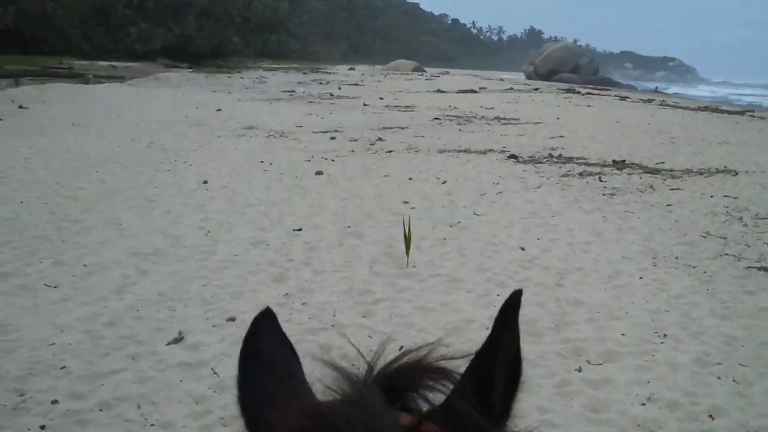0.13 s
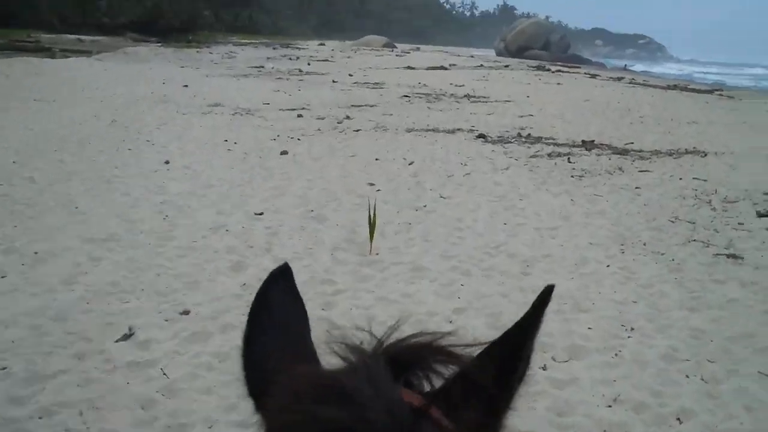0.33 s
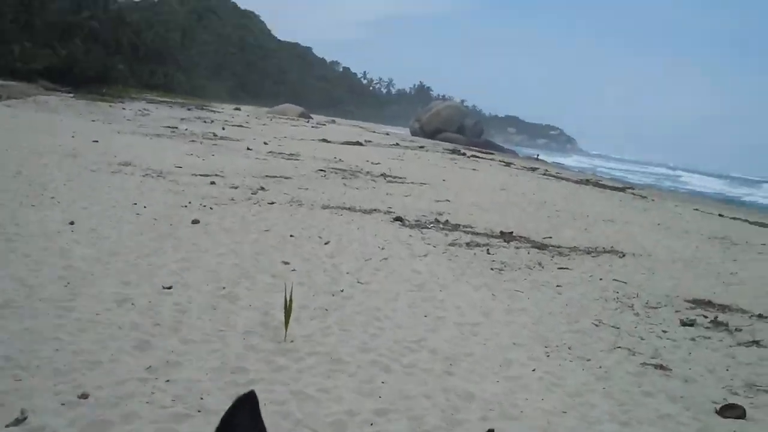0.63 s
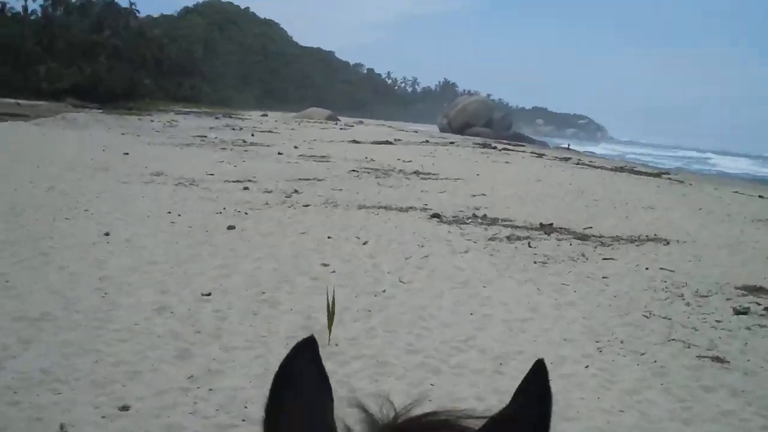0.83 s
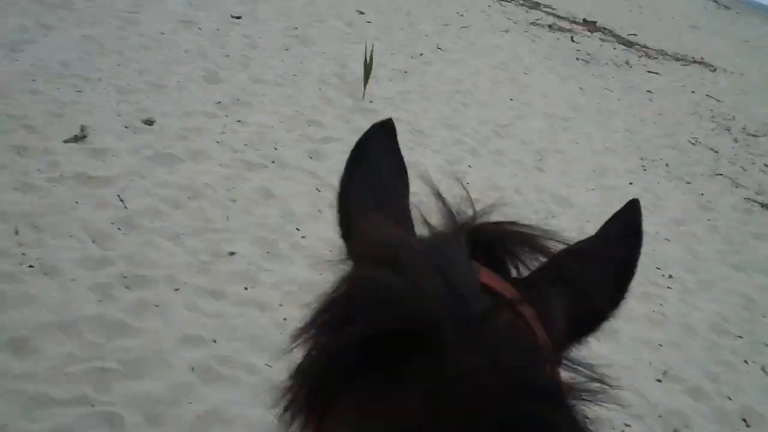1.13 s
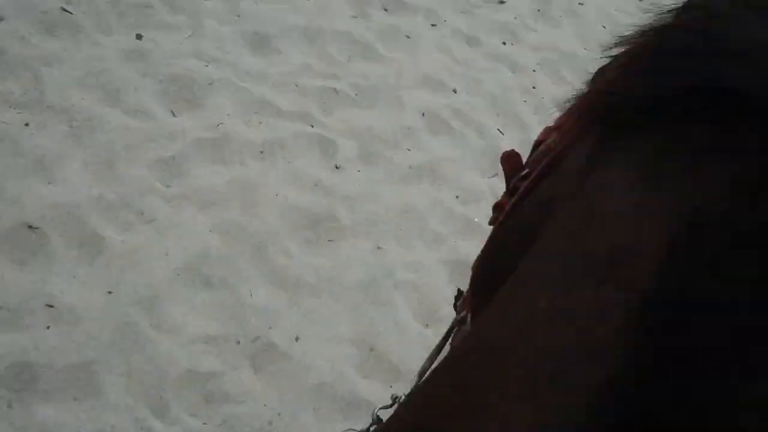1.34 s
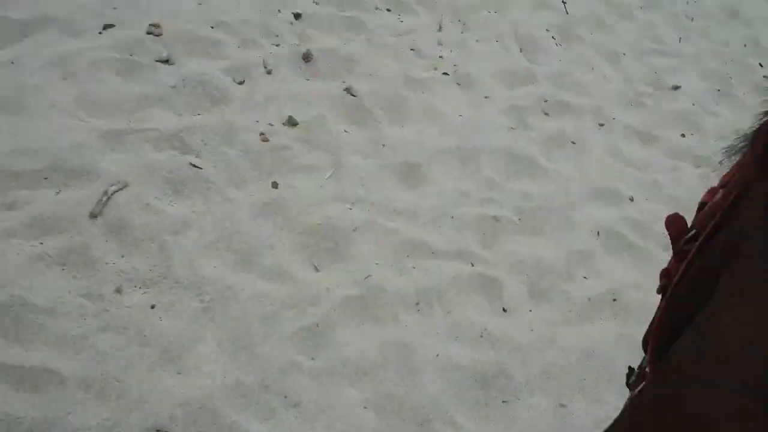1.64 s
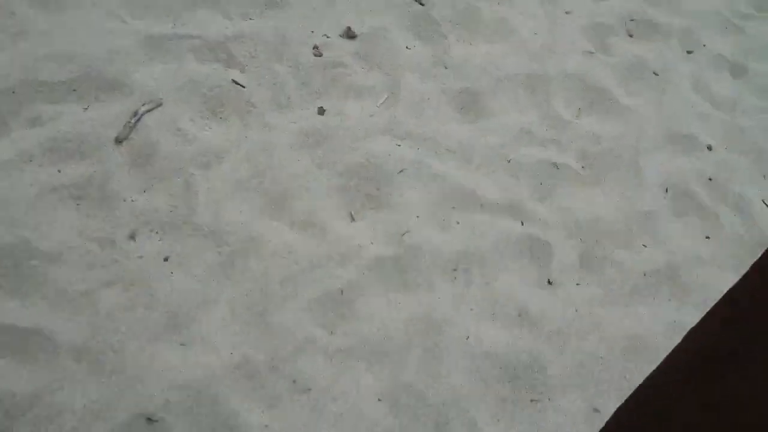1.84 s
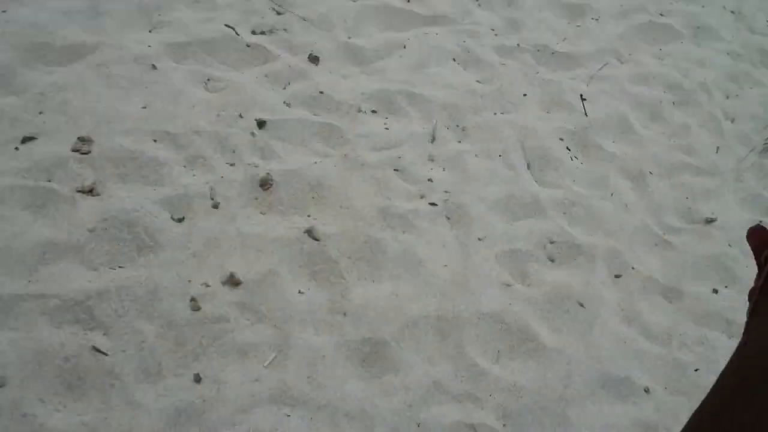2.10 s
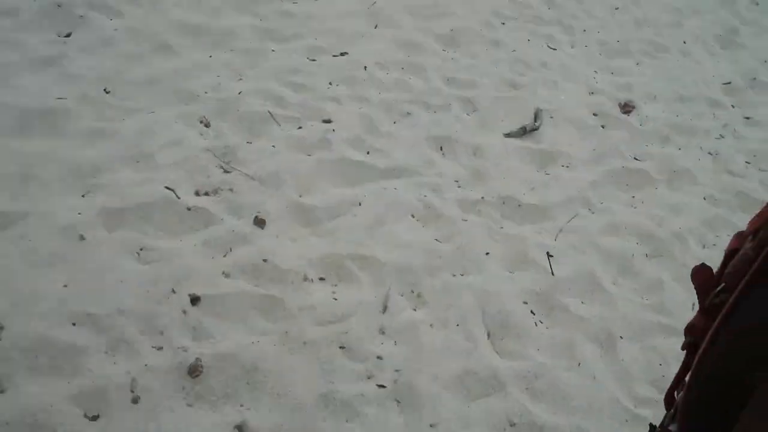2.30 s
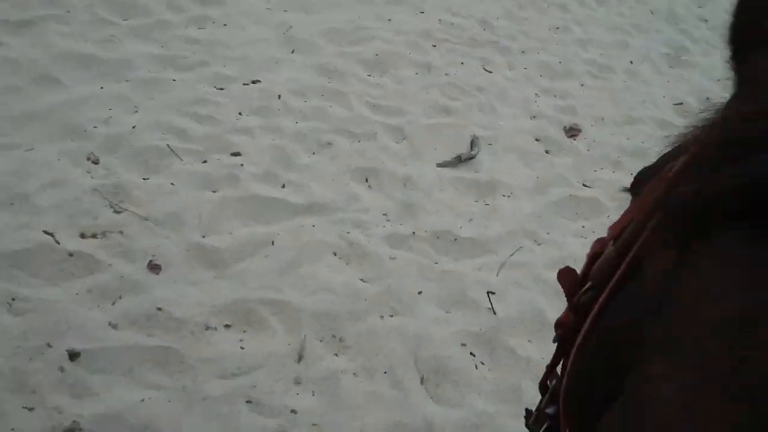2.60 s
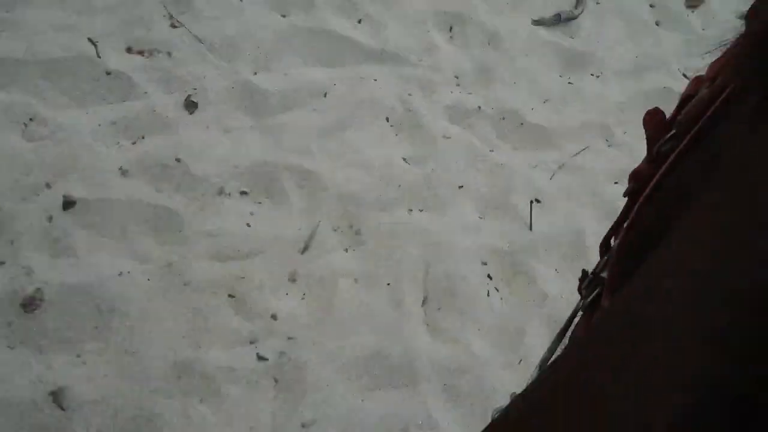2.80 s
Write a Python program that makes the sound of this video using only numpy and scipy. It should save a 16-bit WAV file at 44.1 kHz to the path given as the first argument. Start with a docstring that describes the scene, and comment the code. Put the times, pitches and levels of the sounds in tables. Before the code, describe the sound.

Soft sandy hoof swishes and dull thumps of a walking horse, with leather rubs, clicking tack and surf

```python
"""A horse walking on dry sand

Heard from the saddle: hooves push sand aside in gritty swishes of hiss and grains, with soft low thumps.
Leather rubs, and tack knocks, ticks and squeaks, made from short pulses, decaying rings and narrow noise.
Surf roars steadily some way off and a light wind rumbles on the microphone: both are noise shaped in bands.
A faint high electronic whine runs throughout. Both channels are the same."""
import sys
import numpy as np
from scipy import signal
from scipy.io import wavfile

SR = 44100
rng = np.random.default_rng(int(sys.argv[2]) if len(sys.argv) > 2 else 0)


def dump_mix(stems):
    """Bounce the given channels to the path in sys.argv[1] as a 16-bit WAV at rate SR."""
    frames = np.atleast_2d(stems).T  # one column per channel
    limited = np.clip(frames, -1, 1)  # hard clip at full scale
    pcm = np.round(limited * 32767).astype(np.int16)
    wavfile.write(sys.argv[1], SR, pcm)


N = 130095
TIME = np.arange(N) / SR  # seconds


def from_db(db):
    """Turn decibels into a factor that multiplies the wave."""
    return 10 ** (np.asarray(db) / 20)


def rms_one(x):
    """Scale a sound to an rms (average strength) of 1."""
    return x / np.sqrt(np.mean(x ** 2) + 1e-20)


def level(rows):
    """Draw a loudness curve through (t/s, level/dB) points, as a factor."""
    return from_db(np.interp(TIME, *np.transpose(rows)))


def butter(x, hz, kind, order=2):
    """Filter with a smooth Butterworth response that only looks back in time."""
    safe_hz = np.clip(hz, 5, .48 * SR)
    sections = signal.butter(order, safe_hz, kind, fs=SR, output="sos")
    return signal.sosfilt(sections, x + 1e-18)


def drift(rate_hz):
    """Wander slowly and at random around 0 with spread 1: noise smoothed twice."""
    step = 40  # one slow value per 40 samples, joined by straight lines
    run_in = 2000  # slow values dropped while the filter settles
    pole = np.exp(-2 * np.pi * rate_hz * step / SR)
    noise = rng.standard_normal(N // step + 2 + run_in)
    slow = signal.lfilter([1], [1, -2 * pole, pole * pole], noise)[run_in:]
    return np.interp(np.arange(N) / step, np.arange(len(slow)), rms_one(slow))


def resonate(x, hz, width_hz):
    """Let one narrow resonance ring, with a gain of about 1 at its peak."""
    radius = np.exp(-np.pi * width_hz / SR)
    feed = np.array([1, 0, -1]) * (1 - radius * radius) / 2
    feedback = [1, -2 * radius * np.cos(2 * np.pi * hz / SR), radius * radius]
    return signal.lfilter(feed, feedback, x + 1e-18)


def grains(per_s, spread_db):
    """Scatter single-sample clicks of uneven size at random times; rms 1."""
    size_db = spread_db * np.minimum(rng.exponential(1, N), 4)
    clicks = from_db(size_db) * rng.choice([-1, 1], N)
    return rms_one(clicks * (rng.random(N) < per_s / SR))


def grit(per_s, grain_db, spread_db):
    """Mix smooth hiss with grains at a level relative to it; rms 1."""
    return rms_one(rng.standard_normal(N) + from_db(grain_db) * grains(per_s, spread_db))


def bank(sources, low_hz, high_hz):
    """Split two sources, in turn, into half-octave bands: (centre f/Hz, band)."""
    run_in = SR // 4  # samples for the filters to settle
    edges = low_hz * 2 ** np.arange(0, np.log2(high_hz / low_hz) + .5, .5)
    padded = np.pad(sources, ((0, 0), (run_in, 0)), mode="wrap")
    bands = []
    for k, (low, high) in enumerate(zip(edges, edges[1:])):
        band = butter(padded[k % 2], [low, high], "band")[run_in:]
        bands.append((np.sqrt(low * high), band))
    return bands


def coloured(bands, spectrum, patchy_db):
    """Sum bands under a spectrum while each flickers on its own; rms 1."""
    hz, db = np.transpose(spectrum)
    total = np.zeros(N)
    for centre, band in bands:
        band_db = np.interp(np.log(centre), np.log(hz), db)
        total += band * from_db(band_db + patchy_db * drift(14.0))
    return rms_one(total)


def rubs(rows, width_hz):
    """Make short rubs: noise through one resonance twice, swelling and fading."""
    out = np.zeros(N)
    for s, db, hz, length in rows:
        swell = np.exp(-((TIME - s) / length) ** 2)
        once = resonate(rng.standard_normal(N), hz, width_hz)
        out += from_db(db) * swell * rms_one(resonate(once, hz, width_hz))
    return out


def surf():
    """The steady roar of breakers: broad noise, strongest in the lows."""
    # Tone of the roar, relative only: f/Hz, level per Hz/dB
    surf_spectrum = [(60, 2), (120, 2), (220, -1.5), (310, -6), (450, -13), (750, -16), (1100, -19.5),
                     (2000, -30.5), (3800, -32), (6000, -36), (7400, -40.5), (8300, -45.5), (10000, -39),
                     (12800, -41), (15000, -56)]
    bands = bank(rng.standard_normal((2, N)), 62.5, 16000)
    return from_db(-32.5) * coloured(bands, surf_spectrum, patchy_db=1.5)


def wind():
    """Wind on the microphone: lumpy low noise that grows in the second half, then drops."""
    # Tone of the rumble, relative only: f/Hz, level per Hz/dB
    wind_spectrum = [(10, 2), (20, -1), (32, -4.5), (50, -10.5), (80, -14.5), (130, -20), (300, -32)]
    # Strength of the wind: t/s, level/dB
    wind_strength = [(0, -29.5), (.7, -29), (1.3, -27), (1.8, -27.5), (2.15, -22), (2.45, -23.5),
                     (2.62, -29), (2.8, -21.5), (2.95, -32)]
    bands = bank(rng.standard_normal((2, N)), 8, 350)
    return level(wind_strength) * coloured(bands, wind_spectrum, patchy_db=-0.1)


def leather():
    """Crackly rubbing as the saddle shifts: hiss and grains shaped in bands."""
    # Tone of the rubbing, relative only: f/Hz, level per Hz/dB
    rub_spectrum = [(150, -18), (300, -5.5), (600, -3.5), (1200, -15.5), (2200, -15), (4000, -21),
                    (7000, -52), (14000, -33)]
    # Strength of the rubbing: t/s, level/dB
    rub_strength = [(0, -50.5), (.16, -42), (.32, -48), (.41, -41.5), (.53, -45.5), (.72, -41), (.9, -42.5),
                    (1.08, -45), (1.33, -42.5), (1.42, -45), (2.2, -47.5), (2.65, -48.5), (2.8, -47),
                    (2.95, -55)]
    sources = [grit(per_s=220, grain_db=-4, spread_db=3.5) for _ in range(2)]
    bands = bank(sources, 125, 16000)
    return level(rub_strength) * coloured(bands, rub_spectrum, patchy_db=1.5)


def electronics():
    """A faint steady sine whine with a narrow band of hiss close above it."""
    whine_hz, whine_db = 7867, -68  # level as rms
    halo_hz, halo_width_hz, halo_db = 8320, 360, -67.5
    whine = from_db(whine_db) * np.sqrt(2) * np.sin(2 * np.pi * whine_hz * TIME)
    halo = rms_one(resonate(rng.standard_normal(N), halo_hz, halo_width_hz))
    return whine + from_db(halo_db) * halo


def sand():
    """Sand pushed by a hoof: broad hiss and crackling grains swell, trickle away and may brighten."""
    # Swishes: peak t/s, level/dB, rise to the peak/s, fall after it/s, centre f/Hz,
    # width to each side/octaves, crackle share of the power (0-1), tone shift each way/octaves
    swishes = [(.185, -44.5, 0.065, 0.061, 10400, 3.6, .55, 0),
               (.43, -52.5, 0.038, 0.11, 9000, 3.2, .35, 0),
               (.665, -43.5, 0.22, 0.083, 5960, 3.8, 0.34, 0.21),
               (0.863, -37.5, 0.034, .043, 6260, 1.16, 0.12, .6),
               (.94, -50, .025, 0.037, 10000, 1.7, 0.1, 0), (1.06, -48.5, .039, 0.047, 6630, 2.5, 0.16, 0),
               (1.235, -48, 0.1, 0.05, 8000, 3.9, .4, 0),
               (1.255, -46.5, 0.0088, 0.011, 12500, 0.69, 0.2, 0),
               (1.335, -45.5, 0.032, 0.019, 6500, 4.5, 0.2, 0),
               (1.64, -56, 0.63, 0.11, 10000, 0.77, 0.4, 0.054),
               (2.04, -51.5, 0.042, .039, 6040, 1.7, 0.2, 0.1),
               (2.278, -42.5, .06, 0.033, 2300, 1.1, 0.4, 0.099),
               (2.29, -53.5, 0.046, 0.039, 8000, 2, .2, 0), (2.53, -55.5, 0.071, .092, 8500, 1.5, 0.4, 0),
               (2.81, -45.5, .04, 0.034, 8500, 2.6, 0.5, 0)]
    low_hz, high_hz = 707, 15900
    flicker_db, flicker_hz = 1.0, 30
    brighten_s = 0.036  # the tone moves from low to high around the peak
    crackle = grains(per_s=900, spread_db=3.0)
    fine = bank(rng.standard_normal((2, N)), low_hz, high_hz)
    coarse = bank(np.array([crackle, -crackle]), low_hz, high_hz)
    centres = np.array([[centre] for centre, _ in fine])
    hiss = np.array([rms_one(band * from_db(flicker_db * drift(flicker_hz))) for _, band in fine])
    crunch = np.array([rms_one(band) for _, band in coarse])
    out = np.zeros(N)
    for s, db, rise, fall, hz, octaves, share, brightening in swishes:
        side_s = np.where(TIME < s, rise, fall)
        swell = np.exp(-np.abs((TIME - s) / side_s) ** 1.14)
        on = swell > .01  # work only where the swish can be heard
        climb = brightening * np.tanh((TIME[on] - s) / brighten_s)
        # A hump over the bands, centred on the moving tone
        weights = np.exp(-.5 * ((np.log2(centres / hz) - climb) / octaves) ** 2)
        noises = np.sqrt(1 - share) * hiss[:, on] + np.sqrt(share) * crunch[:, on]
        mix = (weights * noises).sum(axis=0) / np.linalg.norm(weights, axis=0)
        out[on] += from_db(db) * swell[on] * mix
    return out


def add(out, s, sound):
    """Mix a short sound in at time s (seconds), cut off at the end."""
    start = int(np.clip(s * SR, 0, N - 1))
    out[start:start + len(sound)] += sound[:N - start]


def ticks():
    """Bright snaps of buckles and pebbles: a click and a trace of chatter through a band filter."""
    # Ticks: t/s, peak level/dB, centre f/Hz
    tick_rows = [(.1105, -36, 10000), (.134, -34, 10500), (.1893, -26, 10500), (.201, -33, 9500),
                 (.216, -34, 10000), (.2395, -34, 10500), (0.2733, -27, 10900), (.301, -35, 10000),
                 (.572, -31, 10500), (.66, -39, 5500), (.668, -32, 5470), (0.675, -31, 10300),
                 (.687, -36, 5500), (1.204, -32, 6000), (1.316, -39, 9000), (1.712, -30, 4730),
                 (1.7114, -28, 8800), (1.776, -36, 7900), (2.2777, -29, 3900), (2.477, -39, 9900),
                 (2.499, -43, 11500), (2.562, -37, 9250), (2.8657, -23, 6160)]
    chatter_gain, chatter_s = 0.125594, 0.0018  # strength beside a click of 1, decay time
    width = .38  # sets how far the band reaches around its centre
    t = TIME[:SR // 40]
    out = np.zeros(N)
    for s, db, hz in tick_rows:
        chatter = rng.standard_normal(len(t)) * np.exp(-t / chatter_s)
        contact = (t == 0) + chatter_gain * chatter
        snap = butter(contact, [hz / (1 + width / 2), hz * (1 + width / 2)], "band")
        add(out, s, from_db(db) * snap / np.abs(snap).max())
    return out


def knocks():
    """Knocks of the tack: a dull pulse with chatter, then the brief ring of the struck part."""
    # Knocks: t/s, level before the low cut/dB, upper edge f/Hz, ring f/Hz,
    # ring level before its filter, relative to the pulse/dB
    knock_rows = [(.273, -25.5, 2400, 1380, -9), (.279, -27.5, 2200, 1200, -7),
                  (.361, -23.5, 2160, 634, -7), (.379, -29, 3000, 800, -15), (0.3954, -22, 2560, 760, -8),
                  (.407, -37, 3500, 1500, -12), (0.4254, -24.5, 2120, 645, -4),
                  (.445, -21.5, 3650, 1280, -8), (0.538, -31, 3000, 2200, -9), (.5955, -25, 2950, 1130, -7),
                  (.6069, -17, 2030, 1420, -7), (.6078, -27, 1800, 680, 0.5), (.6583, -23, 3500, 1400, -9),
                  (.717, -30, 4500, 2900, -4), (1.0301, -20.5, 2660, 745, -0.5),
                  (1.0316, -27, 2500, 1310, -18), (1.0641, -24.5, 2600, 1430, -5),
                  (1.0645, -26, 2430, 2060, 1.5), (1.076, -26, 2800, 2000, -12),
                  (1.322, -27, 2800, 1140, -3.5), (1.434, -27, 2200, 1710, -15),
                  (1.455, -28, 3280, 2400, -14), (1.491, -30, 3000, 840, -1),
                  (1.493, -28.5, 3200, 2640, 4.5), (1.4937, -34, 3500, 3560, 8),
                  (1.4979, -29.5, 3500, 1300, 5.5), (1.519, -25.5, 3400, 764, -3),
                  (1.533, -32.5, 4000, 1500, 0.5), (1.6083, -23, 1970, 1250, -5),
                  (1.903, -35, 3800, 3340, -3), (1.924, -30, 3280, 1300, -7),
                  (2.725, -32.5, 2190, 1320, -4), (2.753, -28.5, 3800, 660, -1),
                  (2.797, -29.5, 4000, 955, 0), (2.8652, -31, 4500, 2600, -10),
                  (2.903, -25, 2940, 1180, -6), (2.947, -29.5, 2800, 1290, 0)]
    low_cut_hz = 239
    ring_cycles = 21.2  # cycles in which the ring falls by 60 dB
    chatter_db, chatter_s = -14, 0.0055  # level beside the pulse, decay time
    t = TIME[:SR // 10]
    out = np.zeros(N)
    for s, db, edge_hz, ring_hz, ring_db in knock_rows:
        pulse = butter(1. * (t == 0), edge_hz, "low", order=4)
        noise = butter(rng.standard_normal(len(t)), edge_hz, "low", order=3)
        chatter = rms_one(noise) * np.exp(-t / chatter_s)
        contact = pulse / pulse.max() + from_db(chatter_db) * chatter
        contact = butter(contact, low_cut_hz, "high", order=1)
        fading = from_db(ring_db - 60 * t * ring_hz / ring_cycles)
        ring = fading * np.sin(2 * np.pi * ring_hz * t)
        ring = butter(ring, 2 * edge_hz, "low", order=4)  # softens the start of the ring
        add(out, s, -from_db(db) * (contact + ring))  # the first push is downward
    return out


def thumps():
    """Low thumps of the stride, hollow saddle and buffeting air: sines that swell and fade."""
    # Thumps: middle t/s, level of the swell's top/dB, f/Hz, time from the top to about a third/s
    thump_rows = [(0.344, -21, 227, 0.0029), (0.61, -29, 306, 0.0082), (0.425, -22.5, 114, 0.008),
                  (0.728, -28, 282, 0.0069), (0.977, -17.5, 53, 0.014), (1.052, -29.5, 364, 0.0043),
                  (1.075, -26.5, 426, 0.0071), (1.095, -29, 305, 0.012), (1.321, -25, 69.5, 0.0044),
                  (1.948, -18.5, 55, 0.0086), (2.126, -15.5, 32.3, 0.015), (2.392, -20.5, 35, 0.054),
                  (2.524, -17.5, 37.4, 0.017)]
    out = np.zeros(N)
    for s, db, hz, length in thump_rows:
        swell = np.exp(-((TIME - s) / length) ** 2)
        out += from_db(db) * swell * np.sin(2 * np.pi * hz * (TIME - s))
    return out


def squeaks():
    """Thin squeaks of the bit: short rubs in a high, narrow resonance."""
    # Squeaks: middle t/s, level/dB, f/Hz, time from the top to about a third/s
    squeak_rows = [(.385, -55, 12600, .005), (.404, -44, 12500, .0062), (.422, -51, 12500, .004),
                   (.436, -47, 12700, .004), (0.446, -46, 12500, .011), (.478, -53, 14700, .01),
                   (.569, -51, 10400, .005)]
    return rubs(squeak_rows, width_hz=440)


def creaks():
    """Gritty creaks of the straps: short rubs in a lower, wider resonance."""
    # Creaks: middle t/s, level/dB, f/Hz, time from the top to about a third/s
    creak_rows = [(.674, -35.5, 4070, 0.0017), (.85, -48, 3630, 0.025), (1.212, -49.5, 3830, 0.029),
                  (1.248, -40, 3720, 0.0067), (1.32, -52.5, 3850, 0.082), (2.28, -38, 3960, 0.002)]
    return rubs(creak_rows, width_hz=920)


def scene():
    """Add up horse, surf, wind and whine, the same in both channels."""
    tack = leather() + ticks() + knocks() + squeaks() + creaks()
    hooves = sand() + thumps()
    mid = surf() + wind() + electronics() + hooves + tack
    return np.array([mid, mid])


def record(dry):
    """Cut the top steeply with an elliptic low-pass filter."""
    cutoff_hz, ripple_db, stop_db = 14850, .2, 90
    sections = signal.ellip(12, ripple_db, stop_db, cutoff_hz, fs=SR, output="sos")
    return signal.sosfilt(sections, dry)


dry = scene()
out = record(dry)
dump_mix(out)
```